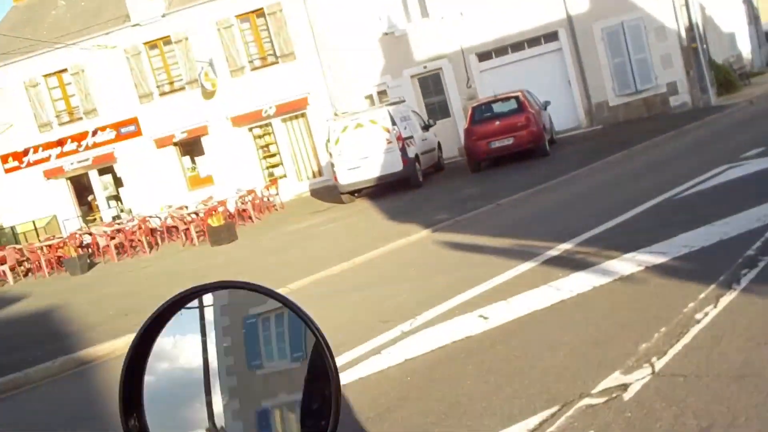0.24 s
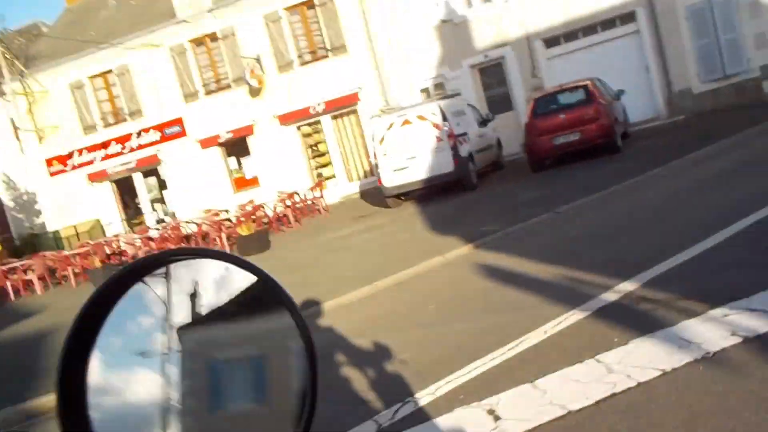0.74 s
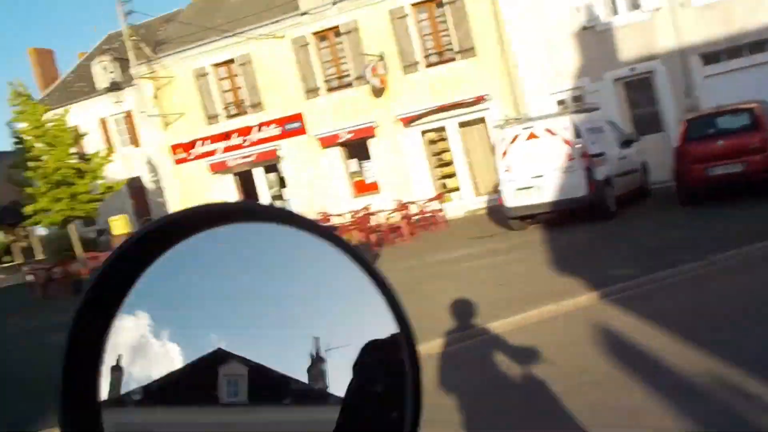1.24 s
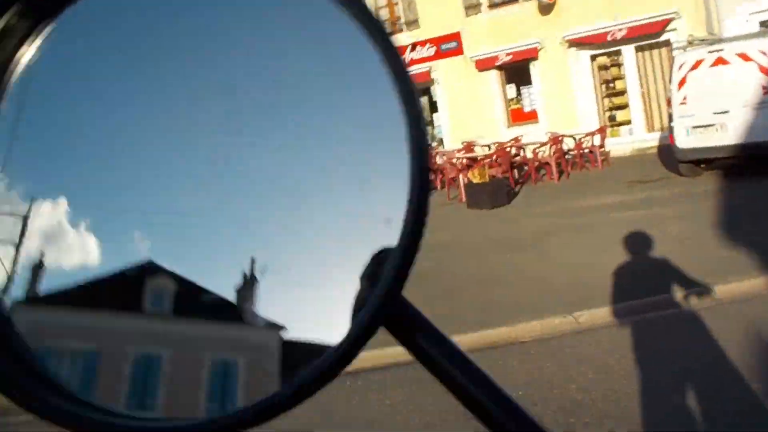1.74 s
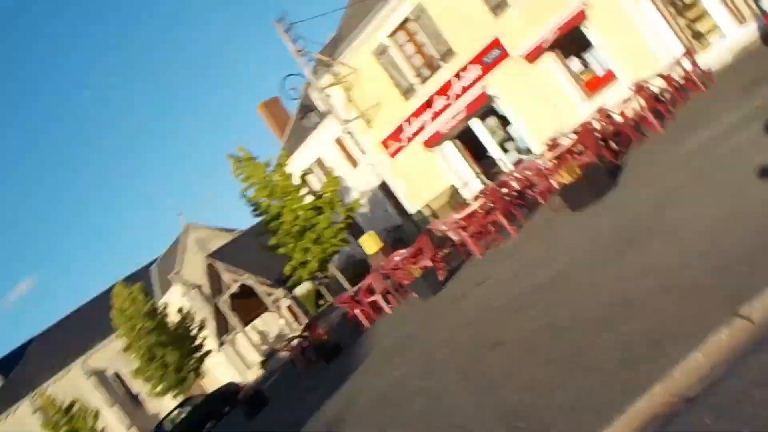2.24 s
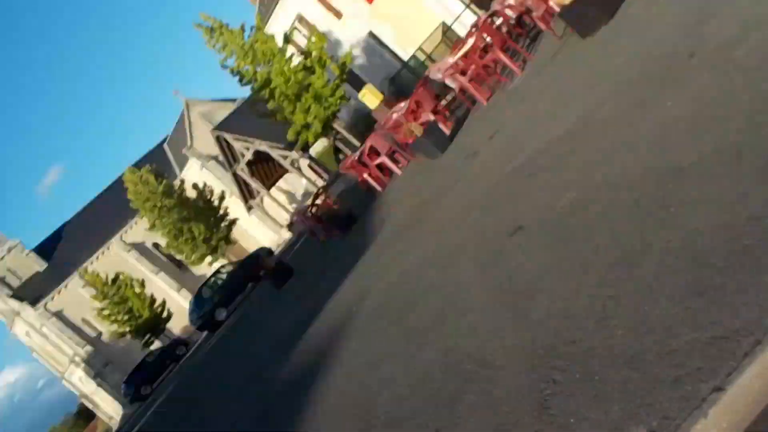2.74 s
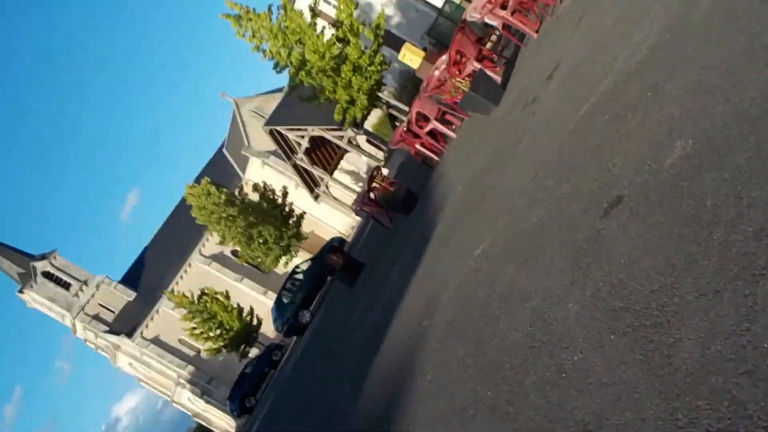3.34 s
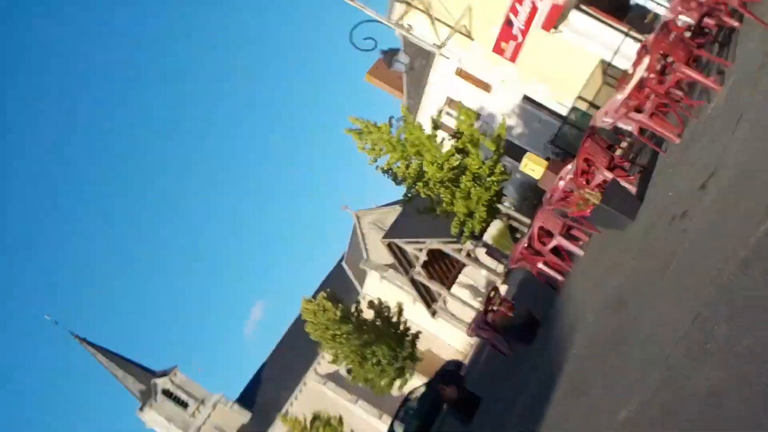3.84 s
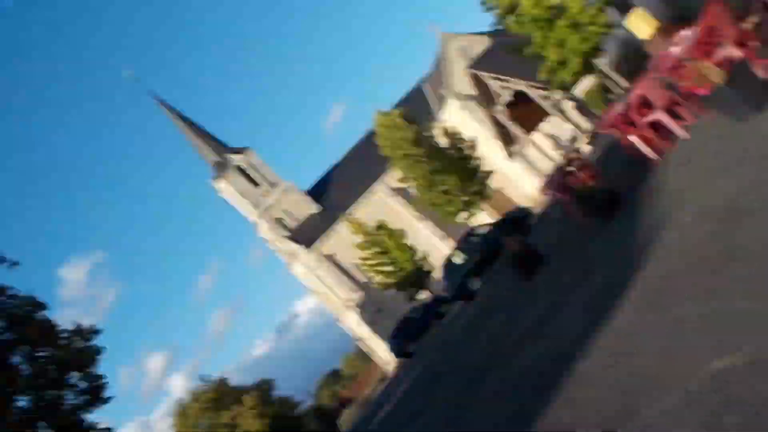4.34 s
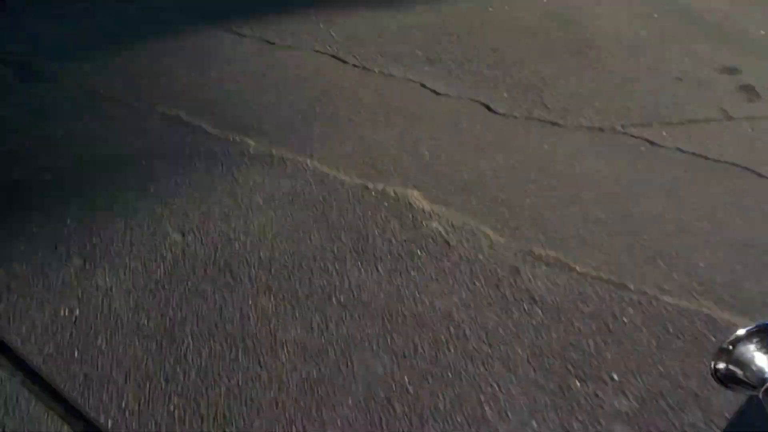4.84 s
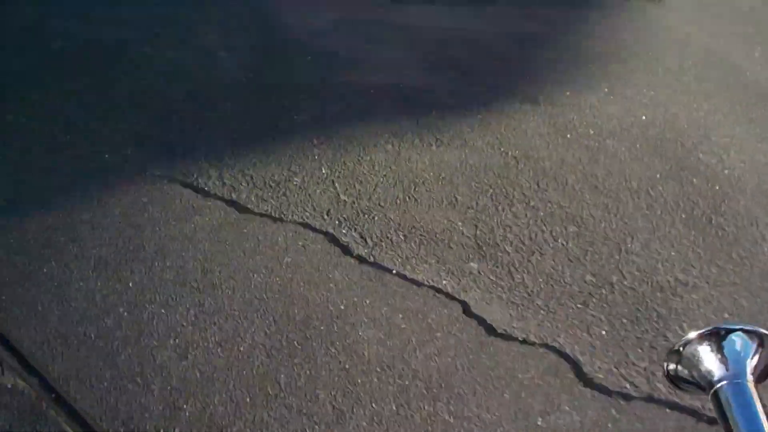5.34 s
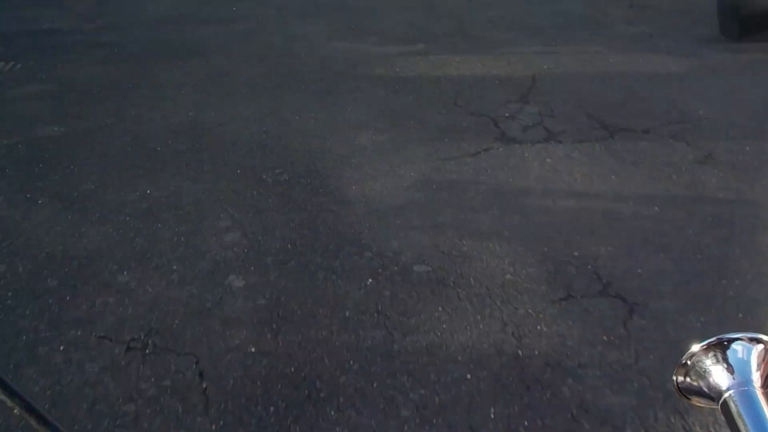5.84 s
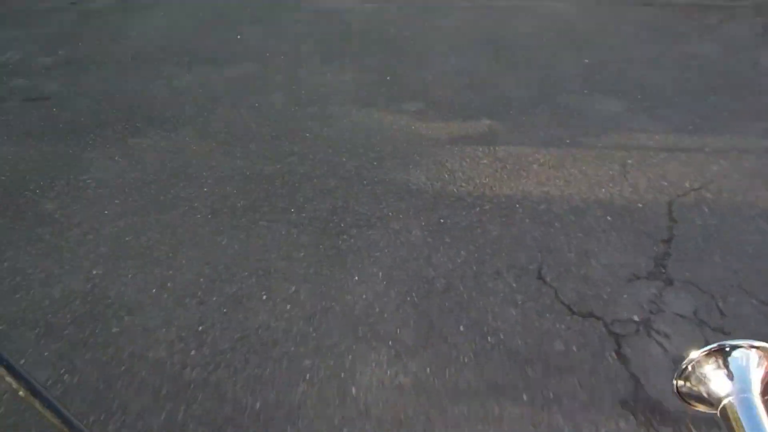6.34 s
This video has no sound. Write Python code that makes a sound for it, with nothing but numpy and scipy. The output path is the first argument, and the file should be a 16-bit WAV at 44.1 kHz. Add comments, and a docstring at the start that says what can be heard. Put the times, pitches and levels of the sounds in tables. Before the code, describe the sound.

Heard from a moped in an open village square: a soft, fluttering two-stroke burble, muffled by the camera's plastic case. Fingers then fumble with the case, giving jerky rubbing, crackles and rapid boxy knocks right at the microphones, almost covering the engine. A brief squeak comes near the end of the fumbling. Afterwards only scattered taps remain while the motor smooths out, grows louder and climbs in speed.

```python
"""In a village square a small two-stroke moped rolls slowly by, heard by a hand-held camera in a plastic case.
The engine is a pulse train of firings exciting exhaust and casing, with modulated gas noise and a soft throb
of overtones, above a faint road rumble. In the middle the grip shifts: damped sines and noise knock on the
case, hiss bursts click, jerky noise scuffs it and a pulse train squeaks briefly, right at the microphones.
The camera's gain control, peak rounding, bass cut, case notches and top cut then shape everything."""
import sys
import numpy as np
from scipy import signal
from scipy.fft import rfft, irfft, next_fast_len
from scipy.io import wavfile
from scipy.ndimage import uniform_filter1d

SR = 44100
rng = np.random.default_rng(int(sys.argv[2]) if len(sys.argv) > 2 else 0)


def waveform_to_disk(signal):
    """Save audio, clipped to [-1, 1], as 16-bit WAV at the path in sys.argv[1]."""
    frames = np.transpose(np.atleast_2d(signal))
    scaled = np.clip(frames, -1, 1) * 32767
    samples = np.round(scaled).astype(np.int16)
    wavfile.write(sys.argv[1], SR, samples)


N = 290627


def undb(db):
    """Decibel law: level [dB] to amplitude ratio."""
    return 10 ** (np.asarray(db) / 20)


def level(x, db):
    """Root-mean-square normalisation to a level [dB]."""
    return x * undb(db) / np.sqrt(np.mean(x ** 2))


def on_grid(table, hz):
    """Logarithmic frequency axis: interpolates a (frequency [Hz], level [dB]) table."""
    f, db = np.transpose(table)
    return np.interp(np.log(hz + 1), np.log(f + 1), db)


def colour(x, table, notches=(), size=4096):
    """Minimum phase: a causal filter built from the cepstrum of a gain curve and its notches."""
    hz = np.arange(size // 2 + 1) * SR / size
    db = on_grid(table, hz)
    db = db + sum(depth * np.exp(-(2 * (hz - f) / width) ** 2) for f, width, depth in notches)
    cepstrum = irfft(db * np.log(10) / 20)
    # fold the cepstrum onto positive times
    cepstrum[1:size // 2] *= 2
    cepstrum[size // 2 + 1:] = 0
    impulse = irfft(np.exp(rfft(cepstrum)))[:size // 2]
    return signal.fftconvolve(x, impulse)[:len(x)]


def band(x, lo_hz, hi_hz):
    """Band-pass resonance: a Butterworth filter."""
    return signal.sosfilt(signal.butter(2, [lo_hz, hi_hz], "band", fs=SR, output="sos"), x)


def ports(mid, other, side, balance):
    """Partial coherence: two microphone ports share mid, differ by an unrelated side, and tilt by band."""
    side = colour(other, side)
    left, right = ([(f, way * db / 2) for f, db in balance] for way in (1, -1))
    return np.array([colour(mid + side, left), colour(mid - side, right)])


def walk(rate):
    """Slow random modulation: levels held 1 / rate seconds and slewed twice; spread near 1."""
    k = int(SR / rate)
    held = np.repeat(rng.standard_normal(N // k + 1), k)
    return 1.4 * uniform_filter1d(uniform_filter1d(held, k), k)[:N]


def swell(t, rise, fall, abrupt=1.0):
    """Asymmetric decay: a bump of height 1 at t = 0, half as high at -rise and at +fall."""
    before = 2. ** -np.abs(t / rise) ** abrupt
    after = 2. ** -np.abs(t / fall) ** 0.77
    return np.where(t < 0, before, after)


# chambers of the silencer: (round trip [s], share sent back [ratio])
CHAMBERS = [(.0031, .35), (.0053, -.3)]


def silencer(x):
    """All-pass dispersion: each chamber smears a bang into echoes without changing its colour."""
    size = next_fast_len(N + SR // 4)
    hz = np.arange(size // 2 + 1) * SR / size
    gain = 1
    for trip_s, back in CHAMBERS:
        delay = np.exp(-2j * np.pi * hz * trip_s)
        gain = gain * (delay - back) / (1 - back * delay)
    return irfft(rfft(x, size) * gain, size)[:N]


OVERTONE_GROUP_HZ, OVERTONE_WANDER_DB, OVERTONE_WANDER_PER_S = 60, 2, 8


def wander(x):
    """Amplitude modulation: neighbouring overtones below 1 kHz swell together, each group on its own."""
    size = next_fast_len(N + SR // 4)
    spectrum, hz = rfft(x, size), np.arange(size // 2 + 1) * SR / size
    steady_top = np.clip(hz / OVERTONE_GROUP_HZ - 15, 0, 1)
    out = irfft(spectrum * steady_top, size)[:N]
    for k in range(16):
        group = np.clip(1 - np.abs(hz / OVERTONE_GROUP_HZ - k), 0, 1)
        gain = undb(OVERTONE_WANDER_DB * walk(OVERTONE_WANDER_PER_S))
        out = out + gain * irfft(spectrum * group, size)[:N]
    return out


# moments at which the throb's levels are given: (time [s], ...)
THROB_TIMES = .2, .95, 3, 5.2, 5.85, 6.5
# even throb of the exhaust: multiple of the firing rate -> (level [dB] at each of those moments)
THROB = {4: (-75, -66, -71, -69, -58, -55), 5: (-60, -58, -71, -70, -55, -48),
         6: (-62, -52, -64.5, -64, -56, -68), 7: (-63, -49, -64.5, -54.5, -46.5, -45.5),
         8: (-64, -56, -61, -46, -49, -39.5), 9: (-57, -55, -64, -51, -50, -44.5),
         10: (-51, -54, -64, -45.5, -42, -54), 11: (-59, -58, -62.5, -48, -48, -48),
         12: (-56, -54, -62, -55.5, -40.5, -61), 13: (-57, -53, -64, -48, -61, -66)}
THROB_WAVER_DB, THROB_SPREAD = 1.5, .01  # slow swell of each overtone; smear of the throb over a turn


def drone(turns):
    """Harmonic synthesis: overtones of the firing rate line up into one soft throb a turn."""
    t = np.arange(N) / SR
    port_phase = np.array([[0], [.1]])  # turns
    out = np.zeros((2, N))
    for k, db in THROB.items():
        gain = undb(np.interp(t, THROB_TIMES, db) + THROB_WAVER_DB * walk(3.5))
        phase = k * turns - THROB_SPREAD * (k - 8) ** 2 + port_phase
        out += np.sqrt(2) * gain * np.cos(2 * np.pi * phase)
    return out


# running of the engine:
# (time [s], mean firing rate [Hz], relative level [dB], exhaust note against that level [dB])
ENGINE_COURSE = [(0, 43, -49, 17), (0.15, 41.14, -45.5, 10.5), (0.35, 41.88, -44.5, 9.5),
                 (0.579, 40.53, -48, 12.5), (0.953, 43.67, -42, 10.5), (1.35, 42.5, -51, 3),
                 (2.2, 42.7, -50, 12.5), (3.2, 38.17, -50.5, 16.5), (3.798, 36.33, -45.5, 6),
                 (4.498, 34.99, -43, 0), (4.947, 37.85, -43.5, 9.5), (5.2, 38.96, -43.5, 8),
                 (5.39, 41.7, -41.5, 3), (5.77, 45.75, -40.5, -2), (6.241, 48.95, -40, -3),
                 (6.336, 49.3, -42, 2), (6.59, 51.55, -39.5, -8)]
# the firing is uneven off throttle and steadies as the throttle opens: (time [s], roughness [0-1])
FIRING_ROUGHNESS = [(0, .4), (1.1, .5), (4.8, .7), (5.25, .16), (6.6, .08)]
# resonance of the exhaust: (frequency [Hz], gain [dB])
EXHAUST_GAIN = [(45, -59.5), (95, -29), (140, -24.5), (195, -17.5), (260, -7), (340, -3.5), (420, 0),
                (500, -2.5), (570, -3.5), (640, -11.5), (800, -9), (1400, -17), (2000, -33), (4000, -86.5)]
# engine noise as it reaches the microphones through the case: (frequency [Hz], relative density [dB per Hz])
GAS_SPECTRUM = [(40, -50), (120, -49), (250, -17.5), (500, -6.5), (900, 1), (1400, 1.5), (1900, -9.5),
                (2800, -17.5), (3800, -14), (5700, -27), (6950, -19.5), (7700, -33.5), (9000, -38),
                (15500, -59.5)]
# stereo width of the engine: (frequency [Hz], side minus mid [dB])
ENGINE_WIDTH = [(60, -5), (110, -7), (200, -1.5), (380, -9.5), (700, -16.5), (1290, -20), (2380, -9),
                (4400, -8.5), (8120, -1), (15000, -36)]
# stereo tilt of the engine: (frequency [Hz], left minus right [dB])
ENGINE_TILT = [(60, -4), (110, -14), (200, 2), (380, -8), (700, 0), (1290, -0.5), (2380, -3.5), (4400, 4),
               (8120, -6.5), (15000, 10)]
TIP_S = 4.4, 4.8  # the camera tips down towards the engine; level pairs are before and after
PING_DB, PING_HZ = (-1.5, -3.5), (1805, 1899)  # each firing pings the metal
RASP_DB, RASP_HZ = (-11.5, -9), (1297, 1630)  # extra rasp of the gas
RING_DB, RING_HZ = (-3.5, -28), (835, 1147)  # ring of the engine casing


def engine():
    """Source and filter: firings excite the exhaust and let out puffs of gas; badly burning cycles scatter."""
    t = np.arange(N) / SR
    s, *columns = np.transpose(ENGINE_COURSE)
    hz, db, exhaust_db = (np.interp(t, s, c) for c in columns)
    rough = np.interp(t, *np.transpose(FIRING_ROUGHNESS))
    turns = np.cumsum(hz * (1 + .05 * rough * walk(35))) / SR
    cycle, phase = turns.astype(int), turns % 1
    strength = undb(2.5 * rough * rng.standard_normal(N // 100)[cycle])
    firings = strength * (np.diff(cycle, prepend=0) > 0)
    # uneven burning also pushes turbulent gas down the pipe between firings
    flow = level(firings, 0) + 1.3 * rough * rng.standard_normal(N)
    exhaust = undb(exhaust_db) * level(wander(colour(silencer(flow), EXHAUST_GAIN)), 0)
    exhaust = exhaust + undb(np.interp(t, TIP_S, PING_DB)) * level(band(firings, *PING_HZ), 0)

    pulse = 0.43 + np.exp(-phase / 0.083) * np.minimum(phase / 0.043, 1)
    puff = strength ** 0.17 * pulse * undb(1.37 * walk(200))
    rasp_gain, ring_gain = (undb(np.interp(t, TIP_S, gains)) for gains in (RASP_DB, RING_DB))
    gas = []
    for _ in range(2):
        hiss = level(colour(puff * rng.standard_normal(N), GAS_SPECTRUM), 12.62)
        gas.append(hiss + rasp_gain * band(hiss, *RASP_HZ) + ring_gain * band(hiss, *RING_HZ))
    late_exhaust = np.pad(exhaust, (90, 0))[:N]  # samples
    heard = ports(gas[0] + exhaust, gas[1] + late_exhaust, ENGINE_WIDTH, ENGINE_TILT)
    return drone(turns) + undb(db) * heard


ROAD_DB, ROAD_HZ = -64.5, (70, 160)


def road():
    """Structure-borne sound: the frame passes on a faint, uneven low rumble."""
    noise = rng.standard_normal((2, N))
    rumble = level(band(noise + 0.54 * noise[::-1], *ROAD_HZ), ROAD_DB)
    return undb(1.5 * walk(8.3)) * rumble


# knocks on the case: (time of the peak [s], relative level [dB], pitch [Hz], rise to the peak from half
# height [ms], fall to half height [ms], left minus right [dB])
BLOWS = [(0.748, -17, 511.4, 2.2, 2.9, -11.9), (0.785, -20.5, 433, 3.7, 5.4, 5),
         (1.116, -14, 1300, 0.66, 2.7, 6), (1.135, -13.5, 630, 1, 2.2, 18),
         (1.151, -13.5, 880, 3.3, 1.4, 11), (1.159, -4, 1420, 0.92, 0.37, -29),
         (1.21, -8, 965, 0.63, 0.86, 10), (1.226, -10, 917, 1.8, 3.1, -20),
         (1.233, -14, 870.0, 1, 0.58, -19), (1.28, -15, 970, 6.2, 1.3, -26), (1.313, -8, 860, 1, 2.9, -28),
         (1.327, -10, 710.0, 2.3, 0.98, 2), (1.339, -6, 750, 0.8, 0.65, -1),
         (1.372, -8, 680.0, 1.2, 0.85, -9), (1.384, -4, 714, 1.1, 1, -20), (1.395, -10, 724, 1.7, 1.1, -6),
         (1.466, -12, 503, 1.6, 1.5, 17), (1.484, -14, 690, 1.4, 3.1, -3), (1.509, -11, 774, 2.9, 1.6, -19),
         (1.518, -10.5, 574, 1.1, 2.6, -4), (1.567, -13, 976, 0.98, 1.7, 7),
         (1.623, -12, 856, 1.3, 0.63, -6), (1.651, -9, 585, 3.1, 2.3, -18),
         (1.685, -11, 893, 1.4, 2.2, -28), (1.717, -8.5, 750, 2.5, 1.5, 12), (1.729, -9, 1475, 1.9, 3.6, 3),
         (1.775, -2, 997, 1.1, 3, 2.5), (1.794, -7.5, 750, 1.26, 0.85, 6), (1.806, -5, 669, 0.9, 1.2, 12),
         (1.821, -12, 810, 0.85, 0.95, -12), (1.884, -7.5, 754, 1.2, 0.85, 5),
         (1.9, -10.5, 600.0, 1.5, 0.89, -16), (1.935, -10, 722, 1.2, 1.4, 15),
         (1.966, -4, 1090, 2.3, 3.5, 2), (1.973, -15, 740.0, 1.5, 1.1, -7),
         (1.982, -4.5, 1333, 2.7, 4.3, 4), (2.044, -7, 860.0, 1.7, 0.7, -7),
         (2.052, -9.5, 890, 1.5, 1.5, -9), (2.061, -11, 720, 1.6, 2.9, -11.1),
         (2.091, -7, 680, 1.2, 1.3, 12), (2.103, -7, 546, 3.7, 0.79, 16), (2.113, -12, 635, 3.7, 1.3, -21),
         (2.145, -14, 1073, 2.9, 1, 23), (2.194, -1.5, 1370, 2.6, 3.1, 3),
         (2.238, -5, 1053, 0.76, 4.1, 4.5), (2.25, -6, 1040, 2.5, 2.2, 2.5), (2.256, -3, 1334, 1.5, 2.3, 1),
         (2.294, -1.5, 860, 1.9, 2.3, 1), (2.301, -5.5, 1370, 2.6, 2.5, 3), (2.325, -12, 1200, 1.5, 1, 5),
         (2.333, -6, 749, 4.5, 1.7, 2), (2.343, -14, 760.0, 3.8, 1.7, 4), (2.381, -8.5, 760.0, 1.5, 1, 7),
         (2.43, -10, 884, 1.5, 2.5, 8), (2.447, -6, 819, 1.4, 0.71, 14), (2.463, -11.5, 520, 4.4, 3.4, -7),
         (2.468, -4, 1364, 3.4, 3.7, 6), (2.481, -2, 1179, 2.8, 1.5, -1.5),
         (2.492, -9.5, 1034, 4.9, 5.6, 1), (2.501, -19, 1310, 1.1, 2, 5), (2.518, -5, 1190, 1.8, 1.6, 3),
         (2.528, -7.5, 1360, 1.6, 3.4, 5), (2.586, -9.5, 835, 1.6, 2.6, 5),
         (2.602, -1.5, 970, 2.4, 1.8, -1.5), (2.614, -11.5, 1390, 7.8, 2.7, 8),
         (2.633, 0, 1080, 2.2, 4.8, 4), (2.656, -6.5, 1410, 1.6, 3, 5), (2.672, -8, 676, 1.2, 1.2, 6),
         (2.71, -5, 625, 5.5, 2, 3), (2.724, -2, 1393, 1.0, 1.6, 8), (2.739, -6, 820, 2.7, 2.2, -8),
         (2.747, -7, 910.0, 2.4, 0.95, -1), (2.766, -3, 880, 5.7, 1.3, 3), (2.783, -15, 960, 3, 2.9, -13),
         (2.797, -7, 1290, 1.8, 2.4, 6), (2.807, -10, 800, 0.99, 1.8, -7),
         (2.824, -5.5, 1196, 2.4, 0.74, 4), (2.832, -1.5, 764, 2.9, 2.7, 1),
         (2.883, -4.5, 1440, 5, 1.8, 3.5), (2.919, -8, 973, 1.2, 3.5, 4.4),
         (2.994, -7.5, 780.0, 1.2, 0.65, -25), (3.02, -10.5, 710, 1.9, 1.4, 8),
         (3.036, -5.5, 1390, 3.1, 2.1, 2), (3.047, -5, 1400, 1.6, 1.8, 1.7),
         (3.065, -5, 1190, 0.83, 1.9, 1.3), (3.082, -4.5, 1025, 0.76, 2, 4.2),
         (3.104, -3, 1310, 1.2, 1.6, 1), (3.115, -16, 809, 2.3, 1.9, 1), (3.121, -6, 1220, 0.59, 2.7, 7),
         (3.153, -3.5, 840, 1.1, 3.4, 4.4), (3.183, -12, 632, 1.3, 5.7, 6),
         (3.269, -16.5, 780, 5.5, 0.85, -4), (3.284, -5.5, 605, 1.4, 1.3, -5),
         (3.324, -13, 930, 1.1, 2.5, 5), (3.381, 1.5, 1080, 1.6, 1.6, 1.5), (3.392, -4, 1360, 3, 3.6, 2.5),
         (3.418, -10.5, 1310, 3.9, 3.2, 5), (3.442, -8.5, 1259, 4.2, 1.5, 2), (3.5, -11, 860, 2.3, 3.3, 2),
         (3.516, -3.5, 1425, 3.1, 3.9, 3), (3.555, -8, 857, 2.7, 1.1, 2), (3.567, -5, 1464, 2.4, 2.2, 4.5),
         (3.637, -5.5, 1368, 6.8, 1.1, 2.6), (3.668, 0, 943, 2.6, 4.1, 2), (3.694, -8, 1020.0, 1.1, 1.1, 5),
         (3.701, -2, 1084, 3.7, 1.1, 1), (3.721, -5, 895, 1.1, 5, 3.2), (3.736, -14, 760, 1.6, 6.2, 3),
         (3.764, -3, 1264, 6.5, 2.1, -2), (3.775, -1.5, 975, 5.9, 2.2, 2.5), (3.79, 1, 1314, 1.2, 2.9, 2),
         (3.815, -4, 820, 3.5, 1.4, 3), (3.835, -1.5, 985, 1, 1.9, 3), (3.851, -10, 863, 8.4, 4.1, 2),
         (3.868, 1, 845, 1, 1.1, 1), (3.878, -11, 694, 0.92, 1.8, 3.6), (3.913, -2.5, 765, 3.7, 1.9, 1.5),
         (3.935, -3.5, 807, 1.16, 2.5, 3), (3.956, -10.5, 780, 6.1, 3.1, 0), (3.972, -8.5, 890, 3.5, 2, 1),
         (3.987, -3, 1260, 5.7, 1, 3.0), (4.006, -6, 886, 1.8, 2.9, 2), (4.022, -4.9, 1400, 3.5, 3.2, 4),
         (4.033, -4, 1307, 0.94, 6, 3.1), (4.045, -15, 1310, 4.0, 1.4, 2), (4.068, -4, 1038, 1.2, 1.1, 8),
         (4.085, -3.5, 1380, 1.2, 2.5, 4.5), (4.107, -11, 1450, 4.9, 1.3, 6),
         (4.118, -5, 1420, 4.4, 2.5, 5), (4.133, -8.5, 1340, 2.4, 0.91, 1), (4.151, -4, 1240, 1.9, 2.3, 4),
         (4.207, -13, 1012, 1.5, 1.9, 3.3), (4.216, -0.5, 843, 1.7, 2.3, 1),
         (4.272, -3.5, 895, 1.5, 0.84, 1), (4.284, -2, 1054, 0.92, 0.68, 0), (4.301, -1, 1375, 3.5, 2.5, 6),
         (4.317, -6, 1110, 2.7, 1.2, 3), (4.329, -13, 1020.0, 1.5, 1.5, 3.7),
         (4.336, -4.5, 1190, 2.8, 3.8, 4), (4.352, -0.5, 1330, 1.3, 2.9, 2.4),
         (4.371, -16, 772, 1.3, 4.1, 7), (4.396, 1.5, 1022, 2, 3, 1.5), (4.409, -4.5, 970, 5.8, 3.8, 5),
         (4.455, -7, 736, 1.1, 2.1, 2.7), (4.47, -22, 1500, 1.2, 1.8, 1), (4.482, -6.5, 1310, 3, 2.4, 5),
         (4.532, -22, 1470, 6.1, 1.4, -5), (4.613, -6.5, 950, 1.1, 1.4, 4.3),
         (4.638, -14.5, 1170, 2.6, 3.1, 5), (4.6575, -8, 1450, 0.89, 1.7, 2), (4.662, -9, 1360, 1.1, 2, 6),
         (4.673, 0, 1400, 2.1, 1.8, 1), (4.6795, -4, 770, 1.4, 2.8, 2), (4.734, -4.5, 930, 1.6, 2, -3),
         (4.822, -15, 1163, 1.2, 3.3, -2), (4.841, -4.5, 840, 1.8, 1.3, 2), (4.864, -8, 816, 4, 1.6, 1),
         (4.872, -10, 940, 2.7, 1.9, 0), (4.919, -3.5, 935, 0.78, 1.2, 5), (4.944, -14.5, 610, 1, 1.9, 10),
         (5.528, -11, 810, 1.7, 2.3, 2.3), (5.553, -14, 1140, 1.1, 0.9, 5),
         (5.715, -6, 1250, 0.7, 1.05, 3.6), (5.997, -10, 1098, 1.1, 1.3, 0),
         (6.059, -21, 1200, 2.6, 1.6, 0), (6.165, -21, 1050, 2, 2.3, -2)]
# ring of the case when handled, also used by the scuffing: (frequency [Hz], relative density [dB per Hz])
CASE_RING = [(25, -40), (90, -24), (200, -20.5), (400, -10), (750, 4.5), (1100, 2.5), (1380, 3.5),
             (1700, -6.5), (2200, -19), (2800, -39), (3600, -23), (4700, -31.5), (6900, -70),
             (10000, -79.5)]
# stereo width of the case: (frequency [Hz], side minus mid [dB])
CASE_WIDTH = [(60, 1), (110, -4), (200, -9), (380, -21), (700, -22), (1290, -12), (2380, -13), (4400, -4),
              (8120, 2), (15000, 23)]
# stereo tilt of the case: (frequency [Hz], left minus right [dB])
CASE_TILT = [(60, -4), (110, -8), (200, -2.5), (380, -4), (700, 0.5), (1290, 2), (2380, -7), (4400, 2),
             (8120, -12), (15000, 8)]
# dull rumble of the blows in the hand: (time [s], level relative to the blows [dB])
HAND_RUMBLE = [(1.1, -36), (2.1, -37), (2.6, -25), (3.4, -24), (4.4, -30.5), (4.7, -36), (4.9, -35)]
CASE_MODES_HZ, KNOCK_HZ = (768, 1408), (257, 2040)
THUD_HZ, THUD_S = (60, 208), 0.046  # band, spread around each blow


def knocks():
    """Impact excitation: short rough blows lean to a pitch and wake the case's more distant mode."""
    around = np.arange(-SR // 40, SR // 20)
    t = around / SR
    rumble = [level(colour(rng.standard_normal(N), CASE_RING), 0) for _ in range(2)]
    rumble = ports(*rumble, CASE_WIDTH, CASE_TILT)
    out = np.zeros((2, N))
    ports_apart = np.array([[1], [-1]])
    draws = rng.random((len(BLOWS), 3))
    for (s, db, hz, rise_ms, fall_ms, pan_db), (start, other, lag) in zip(BLOWS, draws):
        span = int(s * SR) + around
        shape = swell(1000 * t, rise_ms, fall_ms, abrupt=2.0)
        other_hz = max(CASE_MODES_HZ, key=lambda f: abs(np.log(f / hz)))
        skew = 0.083 * (lag - .5) * ports_apart  # in turns: the blow reaches one port a little earlier
        ring = 0.63 * np.sin(2 * np.pi * (hz * t + start + skew))
        ring = ring + 0.21 * np.sin(2 * np.pi * (other_hz * t + other - skew))
        lean = undb(ports_apart * pan_db / 2)
        out[:, span] += undb(db) * lean / lean.mean() * shape * (0.5 * rumble[:, span] + ring)

    shake = uniform_filter1d(np.abs(out).mean(axis=0), int(THUD_S * SR))
    shake = shake * undb(np.interp(np.arange(N) / SR, *np.transpose(HAND_RUMBLE)))
    noise = rng.standard_normal((2, N))
    thud = shake * level(band(noise + 0.61 * noise[::-1], *THUD_HZ), 0)
    return band(out, *KNOCK_HZ) + undb(1) * band(out, 2830, 6000) + thud


# dry clicks of the plastic, each peaking 1 ms after its time:
# (time [s], relative level of the top band [dB], middle band against the top [dB])
SNAPS = [(0.7777, -40, 10), (1.158, -33.5, 7.5), (1.23, -49, 15), (1.236, -45, 10), (1.279, -36.5, 9),
         (1.289, -49, 2), (1.3114, -45, 4), (1.34, -32, 2.5), (1.383, -60, 2), (1.508, -44, 9),
         (1.6467, -49, -2), (1.7734, -47, 9), (1.7925, -48, 3), (1.806, -55, 0), (1.883, -50, 16),
         (1.963, -48, 18.5), (1.976, -50, 7), (2.043, -48, 7), (2.0588, -40, -7), (2.0952, -43, 11),
         (2.1933, -38, 13.5), (2.2373, -56, 17), (2.2557, -32, 3), (2.2922, -36, 8.5), (2.4452, -45, 1),
         (2.4663, -38, 8), (2.4795, -24, 7), (2.5168, -41, 10), (2.6, -48, 15), (2.6315, -34.5, 7.5),
         (2.7, -37.5, 14), (2.736, -43, 15), (2.7621, -34, 14), (2.797, -44, 10), (2.822, -58, 16),
         (2.8774, -42.5, 12), (2.918, -56.5, 22), (2.9926, -53, 12), (3.009, -55, 22), (3.035, -49, 10),
         (3.068, -60, 17), (3.1042, -56, 19), (3.15, -50, 23), (3.184, -55, 22.5), (3.266, -63, 18),
         (3.3783, -37.5, 16.5), (3.407, -39, 18.5), (3.497, -57, 19), (3.518, -57, 10), (3.552, -52, 22),
         (3.616, -55, 21), (3.6305, -44.5, 13), (3.665, -36, 7), (3.7002, -32, 10), (3.7614, -34.5, 10.5),
         (3.773, -38, 4), (3.791, -40, 9), (3.833, -39, 9), (3.8667, -43, 10), (3.911, -33, 12),
         (3.9831, -32.5, 10), (4.017, -41, 14), (4.036, -39, 13.5), (4.0662, -37, 15), (4.085, -46, 8),
         (4.105, -46, 10), (4.1143, -34, 6), (4.2145, -29, 10.5), (4.267, -62, 13), (4.282, -46, 13),
         (4.2995, -46, 14), (4.3357, -36.5, 17), (4.349, -34.5, 11), (4.3943, -38, 17), (4.4064, -31.5, 11),
         (4.4525, -52, 23), (4.479, -52, 26), (4.6598, -59, 14), (4.6734, -42, 9), (4.732, -60, 21),
         (4.9167, -29, 9), (5.285, -42, 13), (5.7139, -28.5, 9), (5.997, -51, 25)]


def clicks():
    """Transient radiation: the plastic snaps in a millisecond or two of hiss, different at the two ports."""
    around = np.arange(-SR // 100, SR // 100)
    t = around / SR - .001
    top, middle = np.zeros((2, N))
    for s, db, middle_db in SNAPS:
        span = int(s * SR) + around
        top[span] += undb(db) * swell(t, 0.0007, 0.0003)
        middle[span] += undb(db + middle_db) * swell(t, 0.0008, 0.0005)
    noise = rng.standard_normal((2, N))
    top_hiss = band(top * noise, 8400, 11400)
    middle_hiss = band(middle * (noise + 0.031 * noise[::-1]), 3250, 5680)
    return 2.46 * top_hiss + 3.08 * middle_hiss


CRACKLES_PER_S = 220
CRACKLE_DB, CRACKLE_SCATTER_DB, CRACKLE_HZ = -37, 5.5, (2700, 6240)  # level relative to the grip


def crackle():
    """Poisson process: tiny random ticks of the plastic, uneven in size and different at each port."""
    struck = rng.random((2, N)) < CRACKLES_PER_S / SR
    ticks = struck * undb(CRACKLE_SCATTER_DB * np.minimum(rng.exponential(size=N), 2))
    burst = uniform_filter1d(ticks, SR // 1000) * rng.standard_normal((2, N))
    return level(band(burst, *CRACKLE_HZ), CRACKLE_DB)


# hand rubbing the case: (time [s], relative level [dB], palm against that level [dB])
RUBBING = [(1.0,-43,0),(1.1,-36,4),(1.15,-23,-1),(1.168,-34,5),(1.198,-33.5,6),(1.22,-21.5,-1.5),(1.247,-29,2.5),(1.326,-23.5,4),(1.351,-31.5,7.5),(1.39,-26,6.5),(1.43,-30.5,10.5),(1.514,-30.5,10.5),(1.54,-27,3),(1.616,-28.5,6),(1.72,-21.5,-6.5),(1.79,-26,2),(1.843,-30.5,6.5),(1.975,-23,0.5),(2.201,-21.5,-3),(2.231,-32,-9),(2.253,-20.5,-8),(2.278,-20.5,-19),(2.335,-21,-8),(2.361,-35.5,6),(2.476,-23,0),(2.564,-37.5,5.5),(2.603,-28.5,2),(2.711,-15,-1.5),(2.84,-29.5,7.5),(2.86,-22.5,-5.5),(2.963,-30.5,6),(3.04,-21,0),(3.129,-15,-6.5),(3.233,-28,-3),(3.327,-45,12),(3.342,-41,2),(3.362,-52,-7),(3.389,-23,-6),(3.515,-22,-16),(3.542,-34,-13),(3.564,-18,-15),(3.609,-25.5,-4),(3.767,-19,-14),(3.85,-18,-24),(3.898,-37,-19),(4.03,-19,-26),(4.117,-14.5,-27),(4.191,-23,-21),(4.221,-21,-17),(4.244,-45,-16),(4.259,-46,-18),(4.275,-26.5,0),(4.345,-15,-1.5),(4.41,-19.5,-8),(4.536,-35,-9),(4.565,-51,0),(4.67,-21,-4),(4.709,-36.5,2),(4.814,-32.5,3.5),(4.838,-27,-1),(5.05,-49,18)]
# borders between regions of the case's ring: (frequency [Hz], ...)
RUB_BORDERS = (150, 620, 1050, 2400, 15000)
RUB_SHIFT_DB, RUB_SHIFTS_PER_S = 4.5, 28  # each region swells on its own


def scuffing():
    """Friction excitation: skin slips in jerks and rings the case; a flat palm adds dull noise at each port."""
    t = np.arange(N) / SR
    s, db, palm_db = np.transpose(RUBBING)
    fade = np.interp(t, [s[0], s[0] + 0.0799, s[-1] - .1, s[-1]], [0, 1, 1, 0])
    jerks = undb(2 * walk(70) + 3.8 * walk(300))
    slips = [level(colour(jerks * rng.standard_normal(N), CASE_RING), 1.0) for _ in range(2)]
    palm = [undb(4.2 * walk(40)) * rng.standard_normal(N) for _ in range(2)]
    palm = np.array([level(band(p, 370, 903), 0) for p in palm])
    slips = ports(*slips, CASE_WIDTH, CASE_TILT)
    regions = zip(RUB_BORDERS, RUB_BORDERS[1:])
    slips = sum(undb(RUB_SHIFT_DB * walk(RUB_SHIFTS_PER_S)) * band(slips, lo, hi) for lo, hi in regions)
    rubbing = slips + undb(np.interp(t, s, palm_db)) * palm + crackle()
    return fade * undb(np.interp(t, s, db)) * rubbing


# resonances of the squeak: (frequency [Hz], width [Hz], relative level [dB])
SQUEAK_RESONANCES = [(1540, 120, 8), (1800, 200, -2), (2770, 150, -9), (3340, 200, -6), (3630, 200, -2)]
SQUEAK_S, SQUEAK_HALF_S, SQUEAK_DB = 4.527, 0.011, -35  # centre, half-length, relative level


def squeak():
    """Stick-slip: quick pulses of the case ring a few narrow bands."""
    t = np.arange(N) / SR
    turns = np.cumsum(192 * undb(0.4 * walk(100))) / SR  # about 192 slips per second
    slips = (np.diff(np.floor(turns), prepend=0) > 0) * 1.
    ring = sum(undb(d) * level(band(slips, f - w / 2, f + w / 2), 0) for f, w, d in SQUEAK_RESONANCES)
    return undb(SQUEAK_DB) * np.exp(-((t - SQUEAK_S) / SQUEAK_HALF_S) ** 4) * ring


def scene():
    """Superposition: the engine and road, and the handling of the case."""
    return engine() + road() + knocks() + clicks() + scuffing() + squeak()


# gain control: level where it starts, share taken back, memory
GAIN_TOP_DB, GAIN_SHARE, GAIN_S = -16.5, 0.23, 0.033


def gain_control(x):
    """Dynamic compression: the camera turns itself down for a moment after loud sounds."""
    keep = np.exp(-1 / (GAIN_S * SR))
    power = signal.lfilter([1 - keep], [1, -keep], np.mean(x ** 2, axis=0))
    return x * (1 + power / undb(GAIN_TOP_DB) ** 2) ** (-GAIN_SHARE / 2)


# response of the camera: (frequency [Hz], gain [dB])
CAMERA_GAIN = [(40, -9.5), (200, -0.5), (13000, 0), (15500, -7)]
# notches of the plastic case: (frequency [Hz], width [Hz], gain [dB])
CASE_DIPS = [(2422, 375, -26), (3002, 180, -15), (4950, 230, -3.5), (8125, 670, -16)]
CEILING, TOP_HZ = .85, 15700  # peak limit as amplitude; top cut


def record(dry):
    """Soft saturation and filtering: gain ducks, peaks round, bass and notches are cut, then the top."""
    heard = gain_control(dry)
    rounded = heard / (1 + np.abs(heard / CEILING) ** 6) ** (1 / 6)
    coloured = np.array([colour(x, CAMERA_GAIN, CASE_DIPS) for x in rounded])
    return signal.sosfilt(signal.ellip(10, .2, 80, TOP_HZ, fs=SR, output="sos"), coloured)


dry = scene()
out = record(dry)
waveform_to_disk(out)
```